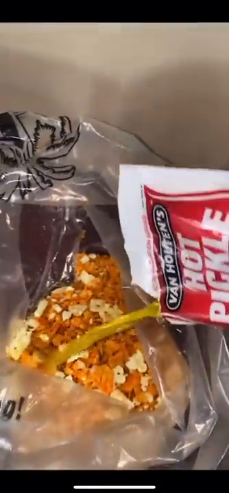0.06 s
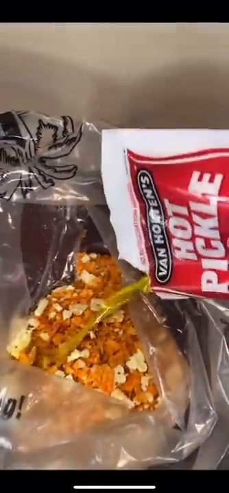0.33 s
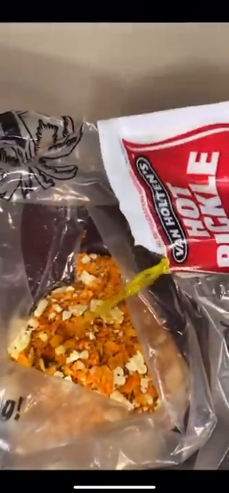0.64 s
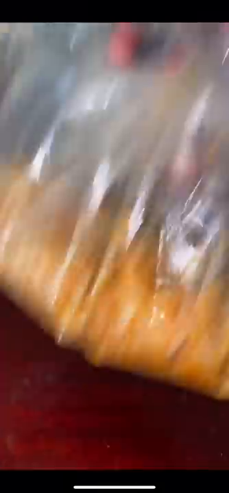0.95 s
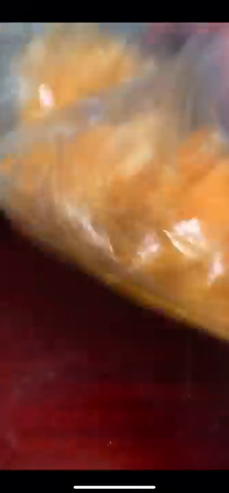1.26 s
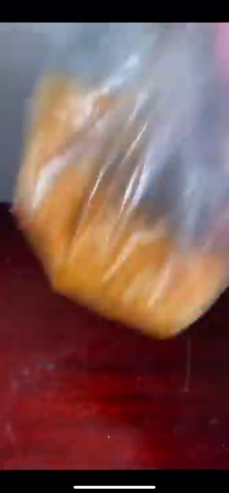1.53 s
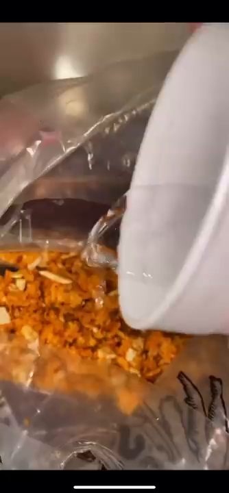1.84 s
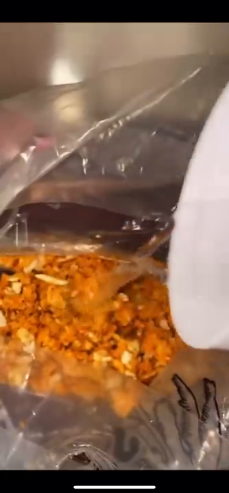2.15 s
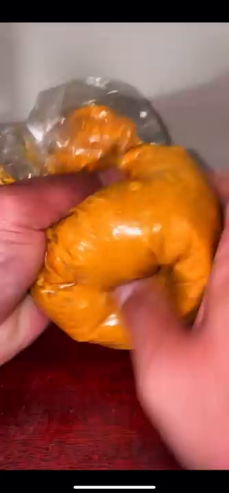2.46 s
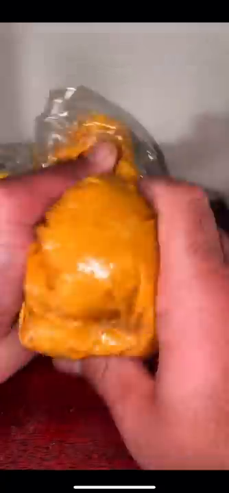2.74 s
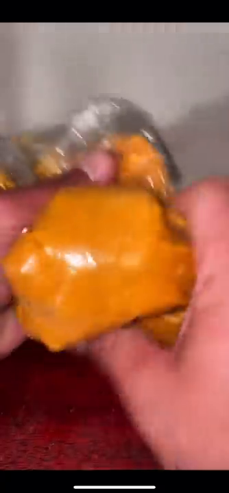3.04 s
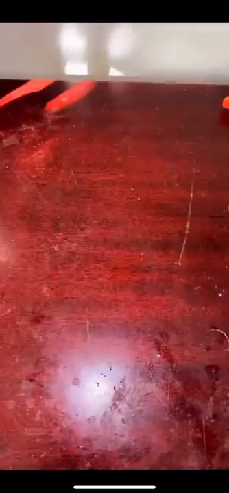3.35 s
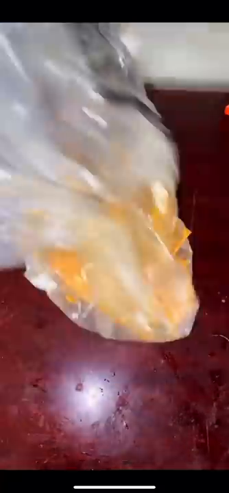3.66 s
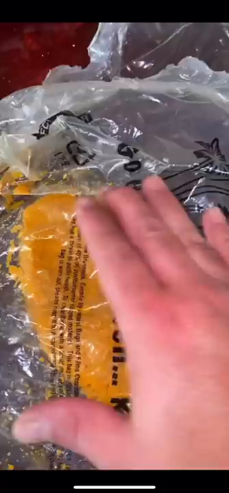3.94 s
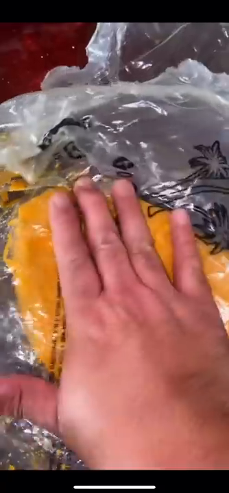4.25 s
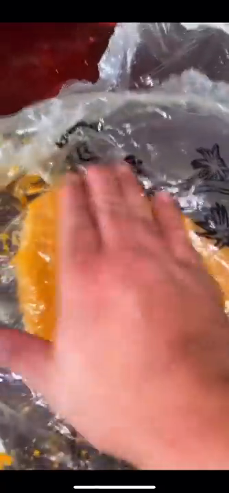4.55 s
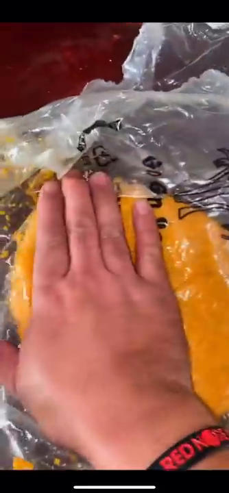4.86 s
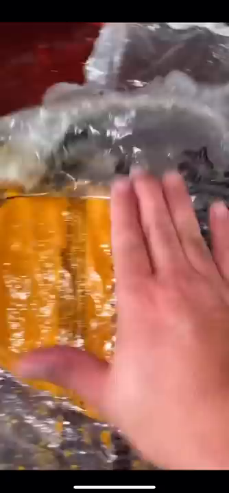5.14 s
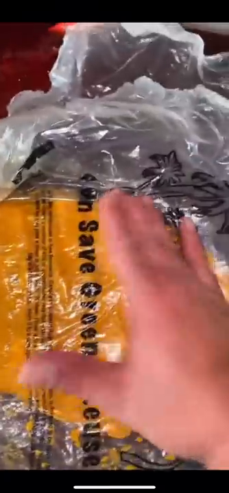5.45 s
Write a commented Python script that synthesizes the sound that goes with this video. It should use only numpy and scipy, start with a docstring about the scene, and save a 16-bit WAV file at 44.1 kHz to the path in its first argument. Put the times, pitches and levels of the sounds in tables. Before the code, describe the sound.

Close up in a small room, six short actions are split by abrupt silences. A sharp plastic crackle opens a quiet trickle of juice on crumbs, followed by loud, quick shaking of the bag. Water patters and plops softly, and the mash rustles as it is kneaded. A heavy wet slap booms on a wooden table, then hand presses make the plastic crackle and snap, with one smaller thump. Low room rumble sits under each action.

```python
"""A plastic bag crackles and juice fizzes as it is squeezed onto the crushed chips inside. Close up, with
silence between the actions, the bag is then shaken, water is dribbled in, and the mash is kneaded, slapped
onto a wooden table and pressed flat. Crumbs and buckling film make swarms of tiny clicks, big creases snap,
bubbles ping, and table and room boom under the blows. The small room rumbles behind each action."""
import sys
import numpy as np
from scipy import signal
from scipy.fft import rfft, irfft
from scipy.io import wavfile
from scipy.ndimage import uniform_filter1d

SR = 44100
rng = np.random.default_rng(int(sys.argv[2]) if len(sys.argv) > 2 else 0)


def wrap_up_sound(samples):
    """Save the sound to the file named by the first command line argument, as 16-bit audio."""
    columns = np.atleast_2d(samples).T
    # keep every value between -1 and 1, then stretch to whole-number steps
    tamed = np.clip(columns, -1, 1)
    steps = np.round(tamed * 32767).astype(np.int16)
    wavfile.write(sys.argv[1], SR, steps)


N = 251370
T = np.arange(N) / SR


def undb(db):
    """Decibels to gain."""
    return 10 ** (np.asarray(db) / 20)


def unit(x):
    """Scale to rms 1."""
    return x / np.sqrt(np.mean(x ** 2))


def add(out, at, sound):
    """Mix a sound in at a time in seconds."""
    i = max(int(at * SR), 0)
    out[i:i + len(sound)] += sound[:N - i]


def fade(t, t60):
    """Exponential decay by 60 dB in t60 seconds."""
    return np.exp(-np.log(1000) * t / t60)


def during(start, end):
    """A gate, open between two times, with millisecond edges."""
    return uniform_filter1d(1. * ((T >= start) & (T < end)), size=64)


def stroke(at, db, build, fall, hold=0):
    """Power envelope of one movement: it builds up to its time, may hold, and falls away."""
    early, late = np.maximum(at - T, 0), np.maximum(T - at - hold, 0)
    return undb(db) ** 2 * np.exp(-(early / build) ** 2 - (late / fall) ** 2)


def colour(x, points, size=4096):
    """Minimum-phase EQ through the given (Hz, dB) points."""
    hz, db = np.transpose(points)
    grid = np.maximum(np.arange(size // 2 + 1) * SR / size, 1)
    gain = undb(np.interp(np.log(grid), np.log(hz), db))
    cepstrum = irfft(np.log(gain))
    cepstrum[1:size // 2] *= 2
    cepstrum[size // 2 + 1:] = 0
    return signal.fftconvolve(x, irfft(np.exp(rfft(cepstrum))))[:len(x)]


def band(x, low_hz, high_hz):
    """Band-pass."""
    return signal.sosfilt(signal.butter(2, [low_hz, high_hz], "band", fs=SR, output="sos"), x + 1e-18)


def noise_band(low_hz, high_hz):
    """Band-passed noise at rms 1."""
    return unit(band(rng.standard_normal(N), low_hz, high_hz))


def scatter(start, end, rate, db, hz, scatter_db=3.0, scatter_octaves=.4):
    """Events at loose intervals, each with its own size and pitch, as rows (s, dB, Hz)."""
    slots, offsets = rng.random(size=64), rng.standard_normal(size=(64, 2))
    times = start + (np.arange(len(slots)) + slots) / rate
    return [(at, db + scatter_db * louder, hz * 2 ** (scatter_octaves * higher))
            for at, (louder, higher) in zip(times, offsets) if at < end]


def crackle(eq, rate, spread_db, hiss_db, facet_db=8, tick_db=-18, burst_t60=0.014, wander_db=3.0):
    """A swarm of tiny bursts, `rate` a second, over shifting friction hiss; rms near 1."""
    chance, size, place = rng.random(N), rng.exponential(size=N), rng.random(N)
    at = np.flatnonzero(chance < rate / SR)
    sizes = undb(spread_db * np.minimum(size[at], 3.5))
    edges_hz = [30, 300, 600, 950, 1300, 1700, 2150, 2650, 3200, 3900, 4800, 6000, 8000, 11000, 17000]
    knots = np.linspace(0, T[-1], 130)
    swarm = np.zeros(N)
    for k, (low, high) in enumerate(zip(edges_hz, edges_hz[1:])):
        # loudest at the pitch of the facet that buckles, with a weak tick in all other bands
        bands_away = np.abs(place[at] * len(edges_hz) - 1 - k)
        energy = np.zeros(N)
        energy[at] = (sizes * (undb(-facet_db * bands_away) + undb(tick_db))) ** 2
        # a fold gives way in a run of slips that dies within milliseconds
        energy = signal.lfilter([1], [1, -fade(1 / SR, burst_t60) ** 2], energy + 1e-18)
        # pockets between the folds open and close, so each band of the friction swells on its own
        friction = np.interp(T, knots, undb(hiss_db + wander_db * rng.standard_normal(len(knots))))
        envelope = np.sqrt(energy / energy.mean() + friction ** 2)
        swarm += band(envelope * rng.standard_normal(N), low, high)
    swarm = colour(swarm, eq)
    # even out the swarm's loudness so the crackle follows its level envelope
    return swarm / np.sqrt(uniform_filter1d(swarm ** 2, size=1764))


# Big creases snapping through, and one wet squelch of the mash at 2.802 s, played the same way. Each row: time
# in seconds, peak in dB, ring in Hz, tick in dB re the ring.
SNAPS = [(.0085, -26.5, 2460, -16), (.0384, -11, 2780, -39), (.0383, -14, 1810, -53),
         (.708, -38, 1470, -15), (1.227, -4.5, 2370, 10), (1.478, -9.5, 2330, -15),
         (1.8135, -3.5, 2620, 14), (2.557, -34.5, 1970, 20), (2.578, -35.5, 2360, 16),
         (2.802, -25.5, 790, -25), (2.907, -23.5, 1140, 7), (2.93, -24.5, 3300, 5), (3.23, -25, 2620, -11),
         (3.267, -24.5, 1820, 6), (3.5541, -20, 4140, 1), (3.64, -33, 4420, -2.5), (3.654, -29.5, 2630, -3),
         (3.679, -33, 2970, -8), (3.6959, -7.5, 2670, 0), (3.79, -20.5, 1940, -12), (3.809, -19, 4420, 3),
         (3.837, -22, 4400, 15), (4.123, -45, 4300, -13), (4.1785, -16.5, 2950, -5),
         (4.186, -14.5, 3720, 4), (4.219, -13.5, 3070, -7), (4.2282, -9, 2340, -2.5),
         (4.32, -26.5, 4140, 4), (4.3315, -25, 2900, -19), (4.3682, -15, 2640, -26),
         (4.3952, -14.5, 1850, -39), (4.497, -25, 1870, 7), (4.512, -22, 3080, -1),
         (4.559, -12, 2810, -8.5), (4.615, -16.5, 2050, -1.5), (4.6288, -21, 1330, -19),
         (4.655, -21, 2450, 5), (4.712, -19.5, 3370, 8), (4.7383, -16.5, 2100, -9),
         (4.808, -22.5, 3520, -15), (4.8595, -19.5, 2670, -19), (4.872, -18, 2130, 15),
         (4.937, -17, 2940, -2), (4.9435, -17.5, 2100, -14), (5.0838, -18.5, 2000, -2),
         (5.109, -17, 2617, -10), (5.1805, -25, 2760, -4.5), (5.2362, -20.5, 2900, -8),
         (5.255, -15.5, 3080, 4), (5.3195, -19, 2600, -8), (5.3612, -14.5, 3200, -3.5),
         (5.407, -22, 2280, -17), (5.4405, -20, 4060, -3), (5.4635, -23.5, 3200, 15),
         (5.538, -27, 3030, -3)]
# Runs of small creases. Each row: start and end in seconds, snaps a second, typical dB and ring in Hz.
CRINKLES = [(2.721, 3.33, 13.6, -36.5, 1900), (4.402, 5.12, 18, -28, 2650), (5.2, 5.55, 16, -28.5, 3240),
            (5.553, 5.68, 30, -52, 6970)]
# The bright EQ of a snap. Each row: frequency in Hz, gain in dB.
SNAP_EQ = [(150, -7), (700, 5), (2500, 7), (5000, 8), (7500, -6), (10500, -22.5), (15000, -22.5)]
def snaps(ring_t60=0.0052, ring_rise_s=0.00013, tick_t60=0.0057,
          flutter_db=-18, flutter_t60=0.033, strain_t60=.004, lead_s=.01):
    """A crease strains, then buckles: a sharp tick, a few cycles of its facet, a duller film flutter."""
    out, t = np.zeros(N), T[:2048] - lead_s
    after, before = np.maximum(t, 0), np.maximum(-t, 0)
    attack = (1 - np.exp(-after / ring_rise_s)) ** 2
    flutter_shape = fade(after, flutter_t60) * fade(before, strain_t60)
    # small creases get a random tick level: some dull, some sharp
    crinkles = [(*crease, tick_db) for row in CRINKLES
                for crease, tick_db in zip(scatter(*row), rng.normal(-4, 7, size=64))]
    noises = rng.standard_normal(size=(256, 2, len(t)))
    for (at, db, hz, tick_db), (tick_noise, flutter_noise) in zip(SNAPS + crinkles, noises):
        ring = np.sin(2 * np.pi * hz * after) * fade(after, ring_t60) * attack
        tick = undb(tick_db) * tick_noise * fade(after, tick_t60) * (t > 0)
        flutter = undb(flutter_db) * band(flutter_noise, 900, 4500) * flutter_shape
        snap = colour(ring + tick + flutter, SNAP_EQ)
        add(out, at - lead_s, undb(db) * snap / np.abs(snap).max())
    return out


# Juice leaving the pouch. Each row: crest in seconds, level in dB, build-up in seconds.
SPURTS = [(.145, -51, .04), (0.371, -53, .022), (.572, -53, 0.023), (.712, -54.5, 0.031), (.88, -54, .016)]
# Air pockets among the wet crumbs. Each row: centre in Hz, width in Hz, relative level in dB.
POCKETS = [(2560, 220, -5.5), (3058, 140, -7.5), (4450, 160, -8.5)]
# The EQ of juice on crumbs. Each row: frequency in Hz, gain in dB.
SQUEEZE_EQ = [(240, -39), (400, -3.5), (460, -34.5), (865, -10), (979, -20), (1110, -6.5), (1440, -8),
              (1650, -7.5), (2590, -2.5), (4050, -8.5), (4510, -6), (10200, -29.5), (16000, -20.5)]
def squeezing(trickle_db=-62, fall_ratio=1.4):
    """Juice spurts and ebbs over a thin trickle; the crumbs crackle and their air pockets ring."""
    spurts = sum(stroke(at, db, build, fall_ratio * build) for at, db, build in SPURTS)
    flow = np.sqrt(undb(trickle_db) ** 2 + spurts)
    crumbs = crackle(SQUEEZE_EQ, rate=830, spread_db=1.5, hiss_db=-8.5)
    pockets = sum(undb(db) * noise_band(hz - width / 2, hz + width / 2) for hz, width, db in POCKETS)
    return flow * (undb(-0.5) * crumbs + undb(-4.5) * pockets)


# The dark EQ of the room tone. Each row: frequency in Hz, gain in dB.
RUMBLE_EQ = [(15, -27), (25, -6), (76, 0.5), (139, -12.5), (178, -8.5), (214, -13.5), (282, -11),
             (309, -15.5), (345, -19), (1000, -27.5), (1300, -65), (2200, -120)]
def rumble(level_db=-55):
    """The room's steady bed of low noise."""
    return undb(level_db) * unit(colour(rng.standard_normal(N), RUMBLE_EQ))


# Tiny bubbles in the juice, then the water.
# Each row: start and end in seconds, bubbles a second, typical level in dB, typical pitch in Hz.
FIZZ = [(0.099, .97, 45, -49, 4300), (2.03, 2.57, 65, -51.5, 4550)]
# Larger bubbles closing under the water. Each row: start in seconds, level in dB, starting pitch in Hz.
BUBBLES = [(2.334, -39, 2110), (2.359, -35.5, 2460), (2.392, -35.5, 2650)]
def bubbles(ring_t60=.02, reference_hz=2500, rise_per_s=11, swell_s=.001):
    """Each bubble pings and glides up as it nears the surface; small, high ones die sooner."""
    out, t = np.zeros(N), T[:2048]
    fizz = [bubble for row in FIZZ for bubble in scatter(*row)]
    for at, db, hz in BUBBLES + fizz:
        phase = 2 * np.pi * hz * (t + rise_per_s * t ** 2 / 2)
        shape = (1 - np.exp(-t / swell_s)) * fade(t, ring_t60 * reference_hz / hz)
        add(out, at, undb(db) * shape * np.sin(phase))
    return out


# A sinking whistle under the juice, a low hum under the kneading, a rising squeak after the slap.
# Each row: time in seconds, pitch in Hz, level in dB.
WHISTLE = [(.46, 1170, -72), (.53, 1140, -71), (.6, 1112, -68), (.7, 1100, -71), (.92, 1088, -76)]
HUM = [(2.8, 131, -69), (2.9, 128.4, -58), (3.15, 130.2, -56.5), (3.3, 126, -46.5), (3.36, 130.4, -53)]
SQUEAK = [(3.87, 1310, -61), (3.95, 1325, -67), (4, 1360, -64.5), (4.017, 1380, -64.5)]
def faint_tone(rows, waver=0.13):
    """A faint gliding sine whose level wavers."""
    times, hz, db = np.transpose(rows)
    flutter = 1 + waver * noise_band(2.5, 25)
    sine = np.sqrt(2) * np.sin(2 * np.pi * np.cumsum(np.interp(T, times, hz)) / SR)
    return sine * flutter * undb(np.interp(T, times, db)) * during(times[0], times[-1])


# Crumbs hitting one end of the bag, then the other.
# Each row: crest in seconds, level in dB, build-up in seconds, pitch of the thud in Hz.
SHAKES = [(1.184, -16, 0.044, 203), (1.23, -12, 0.019, 246), (1.345, -20, 0.039, 253),
          (1.42, -13.5, 0.017, 246), (1.518, -20.5, 0.026, 282), (1.583, -15.5, 0.022, 828),
          (1.674, -16.5, 0.024, 323), (1.743, -14, 0.016, 165), (1.843, -18.5, 0.027, 287)]
# The EQ of the rattle. Each row: frequency in Hz, gain in dB.
SHAKE_EQ = [(24, -43.5), (40, -11), (249, -9), (433, -8.5), (751, -3.5), (942, -2.5), (1090, -10.5),
            (1370, -5.5), (1810, -6.5), (2500, -0.5), (5310, -10.5), (7730, -23.5), (10200, -40),
            (14800, -28.5), (16000, -34)]
def shaking(rattle_db=-26, fall_ratio=0.66, heap_db=-12):
    """Dry crumbs rattle on and crash against the bag at each turn, where the heap gives a hollow thud."""
    power, thuds = undb(rattle_db) ** 2, 0
    for at, db, build, hz in SHAKES:
        swell = stroke(at, 0, build, fall_ratio * build)
        power += undb(db) ** 2 * swell
        thuds += undb(db + heap_db) * swell * noise_band(hz - 100, hz + 100)
    return np.sqrt(power) * crackle(SHAKE_EQ, rate=3500, spread_db=2.5, hiss_db=-3.5) + thuds


# The level of the dribbling water. Each row: time in seconds, level in dB.
POUR_LEVEL = [(2.02, -76), (2.045, -56), (2.22, -64), (2.33, -56), (2.52, -60), (2.58, -52.5)]
# The thin EQ of the dribble. Each row: frequency in Hz, gain in dB.
POUR_EQ = [(290, -41), (500, -44), (761, -5), (1510, -3.5), (2010, -1), (3110, -0.5), (3340, -3.5),
           (4800, -8), (6800, -5), (9920, -26.5), (16000, -11)]
def pouring():
    """Water dribbles onto film and crumbs in a spiky patter."""
    flow = undb(np.interp(T, *np.transpose(POUR_LEVEL)))
    return flow * crackle(POUR_EQ, rate=550, spread_db=9.5, hiss_db=-4.5)


# Drops plopping on slack film. Each row: start in seconds, level in dB, top pitch in Hz, swell in seconds.
DROPS = [(2.3204, -31.5, 1190, 0.0045), (2.452, -35.5, 930, 0.0032)]
def drops(glide_s=0.00115, tick_db=-4, tick_t60=0.0041):
    """Bending waves in the film carry the highs first, so each drop is a quick falling chirp."""
    out, t = np.zeros(N), T[:SR // 10]
    for at, db, hz, swell in DROPS:
        phase = 2 * np.pi * hz * glide_s * np.log1p(t / glide_s)
        shape = t / swell * np.exp(1 - t / swell) + undb(tick_db) * fade(t, tick_t60)
        add(out, at, undb(db) * shape * np.sin(phase))
    return out


# Fingers digging into the mash. Each row: crest in seconds, level in dB.
KNEADS = [(2.789, -42), (2.97, -42.5), (3.139, -45), (3.31, -47.5)]
# The EQ of the bag of wet mash. Each row: frequency in Hz, gain in dB.
MASH_EQ = [(88, -16.5), (150, 0.5), (175, -3), (297, -3), (398, -0.5), (545, -8), (675, 0), (854, 1),
           (3840, -8.5), (5050, -10), (8070, -21.5), (10000, -34), (16000, -24)]
def kneading(grip_db=-51, build_s=0.044, fall_s=0.048):
    """Film and wet crumbs rustle as hard as the fingers work: a steady grip and a dig every so often."""
    digs = sum(stroke(at, db, build_s, fall_s) for at, db in KNEADS)
    effort = np.sqrt(undb(grip_db) ** 2 + digs)
    return effort * crackle(MASH_EQ, rate=1200, spread_db=5.0, hiss_db=-5.5)


def lifting(swing_db=-60):
    """The bag rustles as it is snatched up, then swings almost silently."""
    snatch = stroke(at=3.497, db=-38, build=0.0054, fall=0.019)
    effort = np.sqrt(undb(swing_db) ** 2 + snatch)
    return effort * crackle(MASH_EQ, rate=1300, spread_db=-0.5, hiss_db=-14.0)


# Blows through the mash onto the table.
# Each row: start in seconds, gain in dB, contact time in seconds, t60 of the hand's damping in seconds.
BLOWS = [(3.495, -43.5, 0.0043, 0.41), (3.698, -11, 0.00074, 4.1), (3.71, -30, 0.0033, 0.35),
         (3.737, -22, 0.012, 1), (5.112, -31.5, 0.0013, 0.14), (5.283, -21, 0.0048, 1.7),
         (5.301, -49, 0.011, 1.5)]
# Modes of the boom: the room's deep resonance and the table top's ring.
# Each row: pitch in Hz, relative level in dB, t60 in seconds.
BOOM_MODES = [(56.1, -18, 0.95), (65.7, -10.5, 0.9), (80.5, -11, 0.55), (120, -8.5, .16),
              (153.2, -5.5, 0.29), (175.4, -4, 0.24), (226.6, -8, 0.21), (320.7, -13.5, 0.31),
              (369, -2.5, 0.099), (402, -12.5, 0.091), (634, -11, 0.1), (738, 0.5, 0.097), (984, -12, .09),
              (1180, -6.5, .1)]
def booms():
    """Each blow rings the table top and the room's deep resonance; a longer contact leaves only lows."""
    out, t = np.zeros(N), T[:SR]
    ring = sum(undb(db) * np.cos(2 * np.pi * hz * t) * fade(t, t60) for hz, db, t60 in BOOM_MODES)
    for at, db, contact, damping_t60 in BLOWS:
        push = t * np.exp(-4 * t / contact)
        boom = signal.fftconvolve(ring * fade(t, damping_t60), push / push.sum())[:SR]
        add(out, at, undb(db) * boom)
    return out


# The EQs of the heavy wet smack and of the crumpling film. Each row: frequency in Hz, gain in dB.
SPLAT_EQ = [(40, -22), (120, 5.5), (370, -4), (550, -6.5), (800, -5), (1400, -13), (2700, -8), (4500, -9.5),
            (6500, -22.5), (10000, -45), (15000, -34)]
FILM_EQ = [(88, -45), (150, 6.5), (179, -2), (209, 3.5), (361, 3.5), (675, -7.5), (1310, 2.5), (1560, -5),
           (1940, 4), (2980, 2), (4490, -6.5), (8400, -25), (10200, -39.5), (15100, -22), (16000, -48.5)]
def splat(at=3.6955, spread_s=0.026, smack_db=-11, settle_db=-30, settle_t60=0.31):
    """The wet lump smacks down and spreads; the loose bag collapses after it."""
    age = np.maximum(T - at, 0)
    mash = crackle(SPLAT_EQ, rate=1700, spread_db=4, hiss_db=-3)
    film = crackle(FILM_EQ, rate=1600, spread_db=3, hiss_db=-7.0)
    smack = undb(smack_db) * np.exp(-(age / spread_s) ** 2)
    settle = undb(settle_db) * fade(age, settle_t60)
    collapse = np.sqrt(stroke(at=3.815, db=-37.5, build=.03, fall=0.028))
    return (smack * mash + (settle + collapse) * film) * during(at, T[-1])


# The palm resting on the bag, with a short lift between. Each row: start and hold in seconds, level in dB.
LEANS = [(4.181, .945, -46.5), (5.198, 0.339, -45)]
# The palm pushing the bag flat. Each row: crest in seconds, level in dB, build-up in seconds.
PUSHES = [(4.229, -30, .028), (4.386, -38.5, .025), (4.519, -35, 0.026), (4.655, -40.5, 0.031),
          (4.738, -33, 0.019), (4.829, -40, .025), (4.935, -40.5, 0.05), (5.105, -36, 0.05),
          (5.278, -27, 0.032), (5.36, -46, 0.024)]
def pressing(idle_db=-64, fall_ratio=0.42, reference_db=-42, density_power=0.53):
    """The palm leans and pushes, letting go fast; a harder press buckles more creases a second."""
    leans = sum(stroke(at, db, build=0.014, fall=0.01, hold=hold) for at, hold, db in LEANS)
    pushes = sum(stroke(at, db, build, fall_ratio * build) for at, db, build in PUSHES)
    force = np.sqrt(undb(idle_db) ** 2 + leans + pushes)
    rate = 1300 * (force / undb(reference_db)) ** density_power
    return force * crackle(FILM_EQ, rate, spread_db=6.5, hiss_db=-5.5)


def room(x, near_db=-14, near_t60=0.016, far_db=-16, far_t60=0.3):
    """Quick reflections from table and hands, then the short, duller tail of the room."""
    t = T[:SR // 2]
    near = rng.standard_normal(len(t)) * fade(t, near_t60) * (t > .001)
    far = band(rng.standard_normal(len(t)), 110, 6400) * fade(t, far_t60) * (t > .006)
    echoes = undb(near_db) * near / np.linalg.norm(near) + undb(far_db) * far / np.linalg.norm(far)
    return x + signal.fftconvolve(x, echoes)[:N]


# The six actions: squeeze, shake, pour, knead, slap, press. Each row: start and end in seconds.
ACTION_SPANS = [(0, .985), (1.123, 1.883), (2.02, 2.585), (2.668, 3.352), (3.492, 4.017), (4.103, 5.683)]
def scene():
    """Six actions in turn over the room's rumble, the whole mix gated to silence between them."""
    gates = [during(start, end) for start, end in ACTION_SPANS]
    squeeze, shake, pour, knead, slap, press = gates
    liquids = squeeze * squeezing() + pour * pouring()
    handling = knead * kneading() + slap * lifting() + press * pressing() + shake * shaking()
    close = room(liquids + handling + snaps() + slap * splat() + bubbles()) + drops() + booms()
    background = rumble() + faint_tone(HUM) + faint_tone(WHISTLE) + faint_tone(SQUEAK)
    return ((close + background) * sum(gates))[None]


def record(dry, bass_hz=42, top_hz=15900):
    """Shed the deepest bass, round the loudest peaks and cut the top."""
    thinned = signal.sosfilt(signal.butter(2, bass_hz, "high", fs=SR, output="sos"), dry)
    return signal.sosfilt(signal.ellip(10, .2, 80, top_hz, fs=SR, output="sos"), np.tanh(thinned))


dry = scene()
out = record(dry)
wrap_up_sound(out)
```